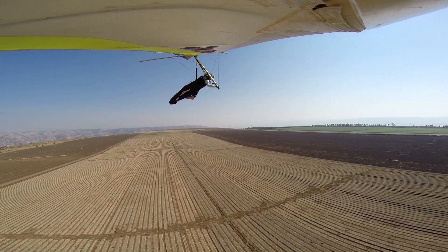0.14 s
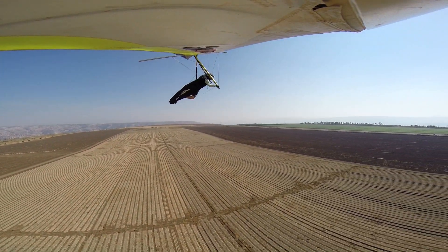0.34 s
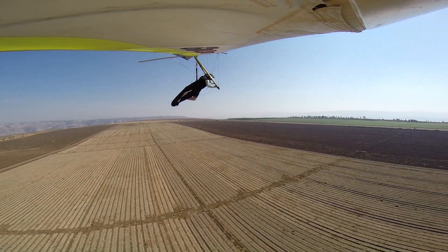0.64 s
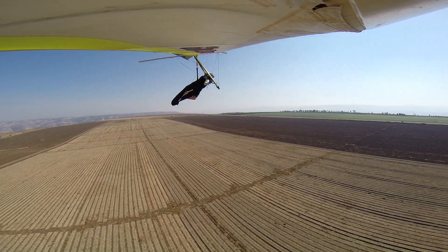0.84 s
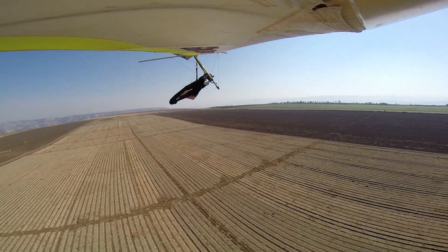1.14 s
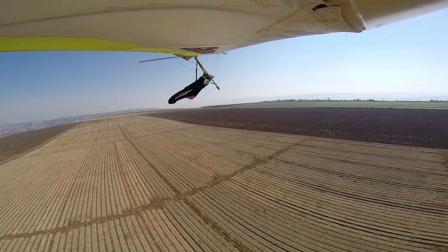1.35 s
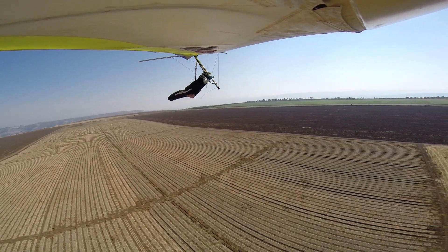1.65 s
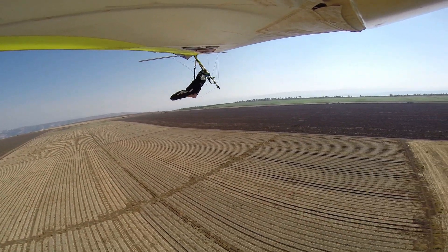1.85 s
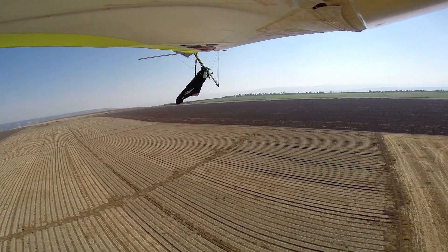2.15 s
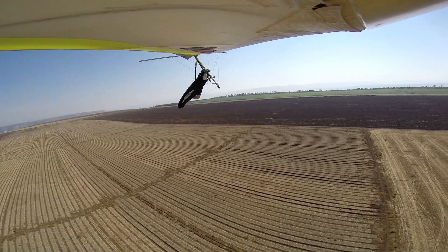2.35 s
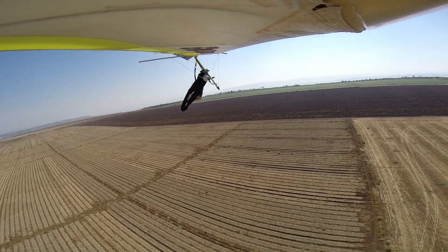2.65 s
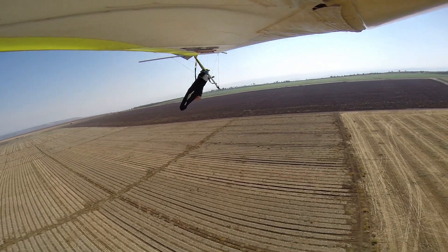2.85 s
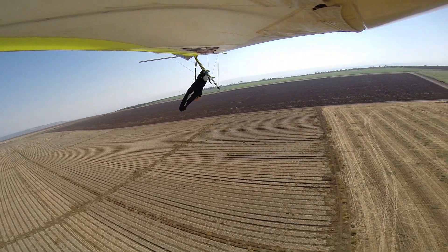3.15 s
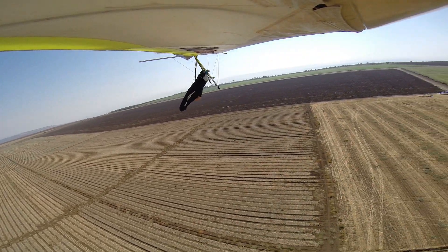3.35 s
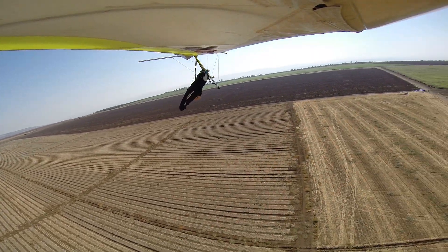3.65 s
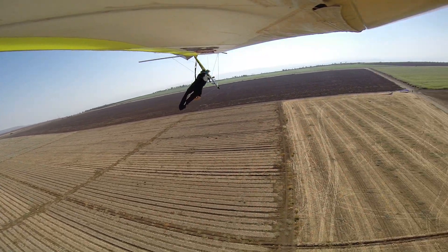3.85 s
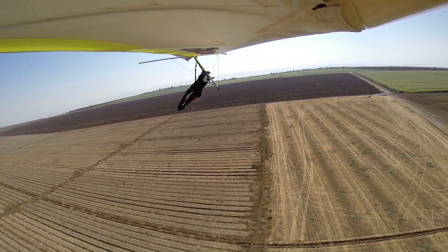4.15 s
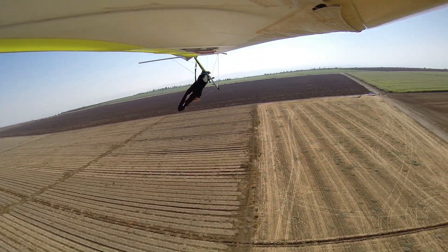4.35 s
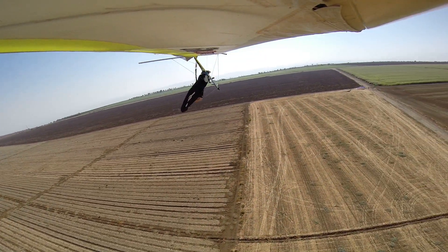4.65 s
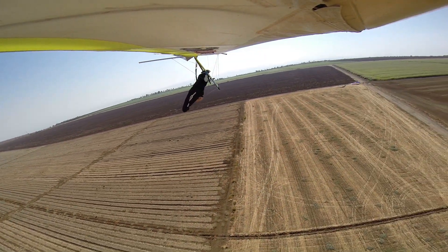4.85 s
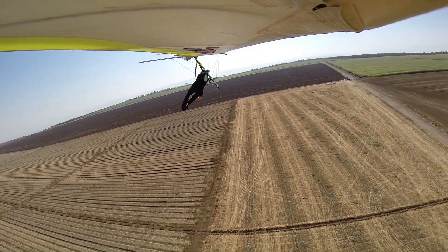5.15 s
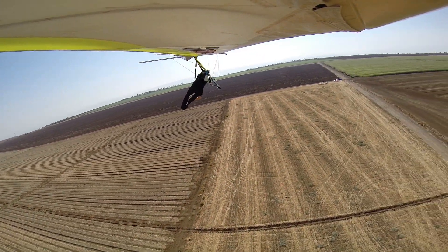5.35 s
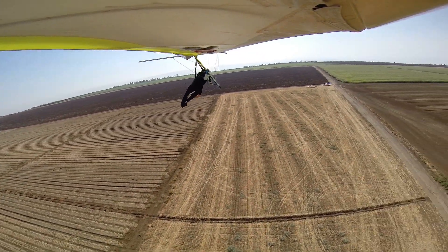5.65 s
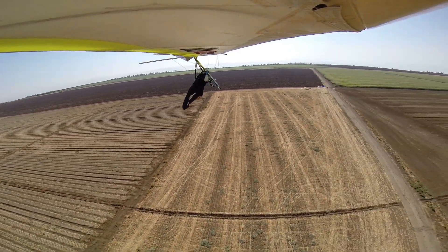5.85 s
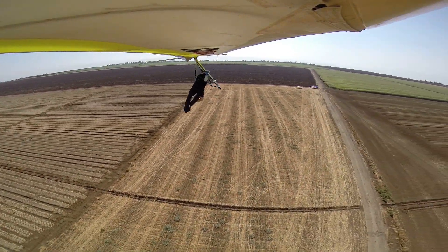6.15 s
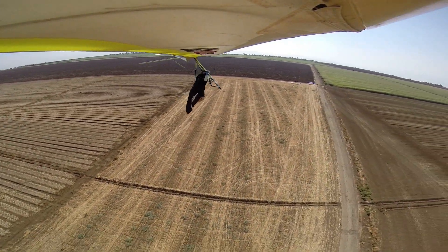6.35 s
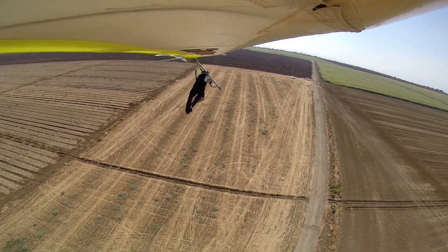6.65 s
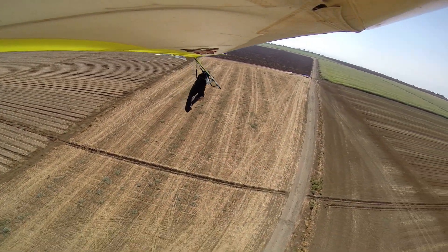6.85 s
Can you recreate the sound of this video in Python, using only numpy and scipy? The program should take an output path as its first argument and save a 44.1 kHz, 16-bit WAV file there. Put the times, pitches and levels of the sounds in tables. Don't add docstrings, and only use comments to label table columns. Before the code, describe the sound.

Close, boxy wind noise in open air high over fields: mostly bass, wavering and pulsing, with little treble. Around two seconds the frame lurches with hard low bangs, rattling ticks and short chirping squeaks, settling by three. Afterwards wind alone builds, gaining rattle and rush after five seconds, with faint knocks and a late chirp. A very faint high electronic whine and microphone hiss lie underneath.

```python
import sys
import numpy as np
from scipy import signal
from scipy.fft import rfft, irfft, next_fast_len
from scipy.io import wavfile
from scipy.ndimage import uniform_filter1d, minimum_filter1d

SR = 44100
rng = np.random.default_rng(int(sys.argv[2]) if len(sys.argv) > 2 else 0)


def to_wav(s):
    ch = np.atleast_2d(s).T
    pcm = np.round(np.clip(ch, -1, 1) * 32767)
    wavfile.write(sys.argv[1], SR, pcm.astype(np.int16))


def nominal_scale(level):
    x = np.asarray(level, float) / 20
    return 10 ** x


N = 309141

# frequency in Hz, density in dB per Hz.
TURBULENCE_SPECTRUM = [(15, -52), (60, -42), (110, -49), (215, -50.5), (320, -62), (700, -69.5),
                       (1300, -82), (1900, -84.5), (3100, -89), (4800, -97), (6200, -102), (8500, -108),
                       (12500, -117), (14500, -130)]
# frequency in Hz, width in Hz, lift in dB above the turbulence.
STRUCTURE_MODES = [(20, 20.4, 15.5), (43.5, 24, 7), (73.6, 32, 2.5), (127, 30, 3), (169.5, 17.6, 6.5),
                   (198.8, 16.2, 9), (245, 34, -1), (394, 50, 5), (464.3, 59, 13), (613.3, 26.4, 8.5),
                   (802, 49, 10), (1083, 154, 13), (1572, 203, 8), (2144, 200, 4), (2398, 134, 9.5),
                   (2666, 100, 3), (3680, 140, 6), (4104, 160, 13), (5435, 227, 14), (7040, 420, 7.5),
                   (8050, 77, 9.5), (8750, 370, 7.5)]
RANGE_EDGES_HZ = [110, 250, 1300, 6100]
CALM_LEVELS_DB = [-27.5, -25.5, -36.5, -45, -70]
# dB per dB of airflow, sway, buffet, jolt, breakaway in turn.
FLOW_DB_PER_DB = [0.53, 0.035, 0.5, 0.97, 1.18]
SWAY_DB_PER_DB = [0.2, .01, .01, .01, .01]
BUFFET_DB_PER_DB = [0.11, 0.57, 0.13, .02, .02]
JOLT_DB_PER_DB = [0.79, .9, 0.9, 0.2, -.8]
BREAKAWAY_DB_PER_DB = [.01, .01, 0.11, 0.062, 0.87]
# time in seconds, strength in dB above the calm glide.
AIRFLOW = [(0.0, 5.5), (0.29, 0.5), (1.29, 1.5), (1.99, -1), (2.5, 1), (2.79, 2), (3.4, 3.5), (4.1, 4.5),
           (4.45, 6), (4.82, 6.5), (5.02, 8.5), (5.23, 10.5), (6.03, 10.5), (6.46, 12.5), (6.72, 11),
           (7.01, 10.5)]
# start in seconds, lift in dB, hold in seconds.
EDDY_SLAPS = [(.06, 4.5, .04), (.33, 10, 0.017), (.76, 4, .002), (1.05, 10, 0.013), (1.72, 7.5, 0.026),
              (3.29, 4.5, 0.024), (3.72, 0.5, .03), (4.28, 2.5, .01), (4.41, 2.5, .03), (4.72, 2, .04),
              (5.13, 2.5, 0.37), (5.54, 4, .02), (5.67, 3.5, 0.011), (5.79, 9, .03), (6.2, 8, .03),
              (6.83, 0, 0.029), (6.97, 4, .01)]
# start in seconds, lift in dB, hold in seconds.
WEIGHT_JOLTS = [
    (2.03, 8, .03),
    (2.118, 13, 0.027),
    (2.17, 7.5, .05),
    (2.285, 10.5, .05),
    (2.38, 5.5, 0.034),
    (2.5, 1, 0.085),
]
# start in seconds, level in dB, hold in seconds, pitch in Hz.
SWAY_GUSTS = [(0, -17.5, 0.25, 40), (0.406, -19, 0.052, 42.15), (0.618, -17.5, 0.018, 41.15),
              (0.755, -18, 0.25, 40.7), (1.176, -15.5, .01, 46.17), (1.285, -15, 0.041, 41.17),
              (1.46, -20, .43, 39.77), (1.957, -13.5, .01, 41.2), (2.136, -15.5, 0.21, 41.09),
              (2.437, -18.5, .17, 40), (2.71, -16, .01, 44.05), (2.819, -19, .03, 42),
              (2.914, -20, .03, 42.6), (3.202, -17, 0.045, 42), (3.468, -17.5, .01, 41.76),
              (3.594, -17, .12, 41.7), (3.858, -19, .01, 39.3), (4.078, -15.5, .01, 40),
              (4.24, -18, 0.0084, 39.9), (4.446, -19.5, .04, 39.4), (4.663, -16.5, .11, 41),
              (4.97, -15.5, 0.027, 39.8), (5.245, -16.5, 0.0091, 41.8), (5.389, -16.5, .02, 41.96),
              (5.597, -13.5, .01, 42.4), (5.707, -14, 0.011, 41.17), (5.99, -17, 0.15, 45.2),
              (6.319, -14, .02, 46.4), (6.462, -17.5, 0.038, 43.5), (6.85, -18, 0.098, 43.5)]
# peak time in seconds, peak level
# in dB, centre in Hz, t60 in seconds.
FRAME_KNOCKS = [(2.044, -17, 160, 0.18), (2.136, -6.5, 149, .11), (2.150, -16.5, 121, 0.13),
                (2.360, -15.5, 170, .12), (2.400, -14, 125, 0.16), (2.038, -25, 406, 0.071),
                (2.106, -24, 790, 0.07), (2.129, -18, 630, 0.057), (2.127, -21, 348, 0.055),
                (2.346, -32, 903, 0.036), (2.1945, -28, 1200, .03), (2.196, -24, 403, 0.039),
                (2.288, -28, 470, 0.046), (2.313, -27, 460, 0.022), (2.663, -29, 830, .014),
                (2.662, -40, 1180, 0.019), (2.744, -29, 510, 0.06), (2.752, -28.5, 780, 0.069),
                (5.146, -26.5, 853, .04), (5.236, -26, 1001, 0.034), (5.392, -26, 688, 0.037),
                (6.460, -24.5, 950, 0.057), (1.538, -37, 2480, .04), (1.553, -36, 2460, .05),
                (1.9145, -30, 2450, .06), (2.073, -42, 2450, .03), (2.215, -16, 190, .1),
                (2.45, -15, 179.5, .12), (2.545, -18.5, 182, .15), (2.152, -28, 1080, 0.026)]
# peak time in seconds, peak level in dB, strongest ring in Hz,
# loss below it in dB per octave, loss above it in dB per octave.
CABLE_TICKS = [(1.1928, -37, 5400, 9, 45), (2.0224, -41, 4200, 12, 10), (2.1043, -32, 3600, 7.1, 45),
               (2.1100, -43, 5400, 45, 30), (2.1198, -33, 3600, 50, 60), (2.1268, -25.5, 2500, 5, 24),
               (2.145, -31, 2550, 39, 90), (2.1566, -53, 5400, 50, 50), (2.1898, -37, 3600, 50, 60),
               (2.3398, -39, 3600, 54, 60), (2.3958, -36, 2550, 54, 50), (2.4400, -39, 3600, 48, 60),
               (2.74, -29.5, 3600, 8, 70)]
# frequency in Hz, t60 in seconds.
CABLE_RINGS = [(1500, 0.024), (2550, 0.013), (3620, 0.013), (4300, 0.0039), (5400, 0.014), (7100, 0.0033),
               (9000, .005), (11700, .004), (14000, .004)]
# start in seconds, peak level in dB, final pitch in Hz, t60 in seconds.
PULLEY_SLIPS = [(1.524, -33, 2650, .035), (1.538, -29, 2570, .045), (1.553, -40, 2540, .035),
                (1.9095, -27, 2620, .07), (1.924, -32, 2600, .05), (1.945, -43, 2540, .04),
                (2.1425, -16, 2430, .07), (2.147, -14, 2375, .075), (2.168, -21, 2350, .09),
                (2.186, -26, 2345, .06), (2.2, -32, 2350, .04), (2.452, -26, 2580, .05),
                (2.459, -20, 2455, .045), (2.464, -19, 2430, .025), (2.486, -28, 2510, .045),
                (2.499, -35, 2445, .035), (6.735, -23.5, 2385, .05), (6.752, -32, 2385, .07)]
SLIP_HARMONICS_DB = [0, -54.5, -53]
# frequency in Hz, level in dB.
READOUT_LINES = [(11707, -74), (14622, -89), (11570, -88)]
# frequency in Hz, density in dB per Hz.
SELF_NOISE_SPECTRUM = [(3000, -112), (9000, -115), (12300, -117), (13200, -124), (15000, -125)]


def in_time(rows):
    s, *columns = np.transpose(rows)
    return [np.interp(np.arange(N) / SR, s, column) for column in columns]


def rms_one(x):
    return x / np.sqrt(np.mean(x ** 2))


def drift(rate_hz):
    pole = np.exp(-80 * np.pi * rate_hz / SR)
    noise = rng.standard_normal(N // 40 + 2002)
    slow = signal.lfilter([1], [1, -2 * pole, pole * pole], noise)[2000:]
    return np.interp(np.arange(N) / 40, np.arange(len(slow)), rms_one(slow))


def swells(rows, rise_db_per_s, fall_db_per_s, floor_db):
    t, out = np.arange(0, N + 64, 64) / SR, floor_db
    for s, db, hold_s, *_ in rows:
        rising = rise_db_per_s * np.maximum(s - t, 0)
        falling = fall_db_per_s * np.maximum(t - s - hold_s, 0)
        out = np.maximum(out, db - rising - falling)
    return np.interp(np.arange(N) / SR, t, out)


def spectrum(rows, hz):
    table_hz, table_db = np.transpose(rows)
    return nominal_scale(np.interp(np.log(hz), np.log(table_hz), table_db))


def body(size):
    s = 1j * np.fft.rfftfreq(size, 1 / SR)
    lift = [1 + (nominal_scale(db) - 1) * s * width / (s * s + s * width + hz * hz)
            for hz, width, db in STRUCTURE_MODES]
    return np.prod(lift, axis=0)


def turbulence(levels_db, flicker_db, flicker_hz):
    size = next_fast_len(N)
    hz = np.maximum(np.fft.rfftfreq(size, 1 / SR), 1)
    colour = spectrum(TURBULENCE_SPECTRUM, hz) * body(size) * (hz > 12)
    below = [0] + [1 / (1 + (hz / edge) ** 8) for edge in RANGE_EDGES_HZ] + [1]
    out = np.zeros(N)
    for k, level_db in enumerate(levels_db):
        share = np.sqrt(np.maximum(below[k + 1] - below[k], 0))
        layer = irfft(rfft(rng.standard_normal(size)) * colour * share, size)[:N]
        out += rms_one(layer) * nominal_scale(level_db + flicker_db[k] * drift(flicker_hz))
    return out


def sway(level_db):
    pitch_hz, = in_time([(s + hold_s / 2, hz) for s, _, hold_s, hz in SWAY_GUSTS])
    phase = 2 * np.pi * np.cumsum(pitch_hz + 5.5 * drift(17.7)) / SR
    return np.sqrt(2) * nominal_scale(level_db + 0.71 * drift(22)) * np.cos(phase)


def heave(jolt_db):
    band = signal.butter(2, (9, 26), "band", fs=SR, output="sos")
    lurch = signal.sosfilt(band, rng.standard_normal(N + SR))[SR:]
    return nominal_scale(-31 + 1.3 * uniform_filter1d(jolt_db, size=6000)) * rms_one(lurch)


def contacts():
    rows = list(FRAME_KNOCKS)
    for s, db, top_hz, below, above in CABLE_TICKS:
        for hz, t60_s in CABLE_RINGS:
            loss_db = max(below * np.log2(top_hz / hz), above * np.log2(hz / top_hz))
            rows.append((s, db - loss_db, hz, t60_s))
    return rows


def knocks():
    out, size = np.zeros(N), 8192
    t, modes = np.arange(size) / SR, body(size)
    fade = np.minimum(1, 4 - 4 * t / t[-1])
    for s, db, hz, t60_s in contacts():
        grit = 0.8 * rng.standard_normal(size)
        shape = (1 - np.exp(-t * hz / 2)) * nominal_scale(-60 * t / t60_s)
        burst = (np.sin(2 * np.pi * hz * t) + grit) * shape
        band = signal.butter(2, [hz / 1.2, hz * 1.2], "band", fs=SR, output="sos")
        rung = irfft(rfft(signal.sosfilt(band, burst)) * np.sqrt(modes), size) * fade
        start = round(s * SR) - np.abs(rung).argmax()
        out[start:start + size] += nominal_scale(db) * rung / np.abs(rung).max()
    return out


def squeaks():
    rise_s, sag_hz, sag_s = 0.008, 55, 0.012
    t = np.arange(SR // 5) / SR
    power, weighted_hz = np.full(N, 1e-14), np.full(N, 2500e-14)
    for s, db, last_hz, t60_s in PULLEY_SLIPS:
        start = round(s * SR)
        span = slice(start, start + len(t))
        rise = np.sin(np.pi / 2 * np.minimum(t / rise_s, 1)) ** 2
        decay = nominal_scale(-60 * np.maximum(t - rise_s, 0) / t60_s)
        slip_power = (nominal_scale(db) * rise * decay) ** 2
        power[span] += slip_power
        weighted_hz[span] += slip_power * (last_hz + sag_hz * np.exp(-t / sag_s))
    phase = 2 * np.pi * np.cumsum(weighted_hz / power + 14 * drift(70)) / SR
    tone = sum(nominal_scale(db) * np.sin((k + 1) * phase) for k, db in enumerate(SLIP_HARMONICS_DB))
    return np.sqrt(power) * nominal_scale(1.2 * drift(110)) * tone


def whine():
    frame_s = 1001 / 30000
    since_s = (np.arange(N) / SR) % frame_s
    return sum(nominal_scale(db) * np.sin(2 * np.pi * hz * since_s) for hz, db in READOUT_LINES)


def self_noise():
    hz = np.maximum(np.fft.rfftfreq(N + 1, 1 / SR), 1)
    colour = spectrum(SELF_NOISE_SPECTRUM, hz) * np.sqrt(SR / 2)
    return irfft(rfft(rng.standard_normal(N + 1)) * colour, N + 1)[:N]


def scene():
    flow_db, = in_time(AIRFLOW)
    sway_db = swells(SWAY_GUSTS, rise_db_per_s=205.5, fall_db_per_s=175, floor_db=-34)
    buffet_db = swells(EDDY_SLAPS, rise_db_per_s=122, fall_db_per_s=85, floor_db=0)
    jolt_db = swells(WEIGHT_JOLTS, rise_db_per_s=300.5, fall_db_per_s=92, floor_db=0)
    breakaway_db = np.maximum(flow_db - 6, 0)
    causes = np.array([flow_db, sway_db - sway_db.mean(), buffet_db, jolt_db, breakaway_db])
    gains = np.transpose([FLOW_DB_PER_DB, SWAY_DB_PER_DB, BUFFET_DB_PER_DB, JOLT_DB_PER_DB, BREAKAWAY_DB_PER_DB])
    levels_db = np.array(CALM_LEVELS_DB)[:, None] + gains @ causes
    wind = turbulence(levels_db, flicker_db=[0.8, 0.73, 0.6, 0.4, 0.6], flicker_hz=15)
    structure = wind + sway(sway_db) + heave(jolt_db)
    fittings = knocks() + squeaks()
    electronics = whine() + self_noise()
    return (structure + fittings + electronics)[None]


def roll_off(x):
    return signal.sosfilt(signal.butter(12, 15110, fs=SR, output="sos"), x)


def record(dry):
    room = np.minimum(1, 0.8 / (np.abs(dry) + 1e-9))
    gain = uniform_filter1d(minimum_filter1d(room, size=900), size=900)
    return roll_off(dry * gain)


dry = scene()
out = record(dry)
to_wav(out)
```